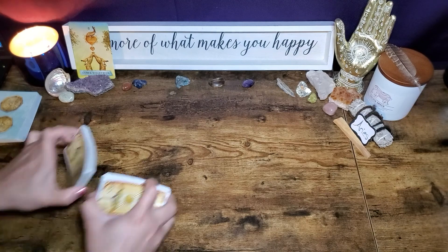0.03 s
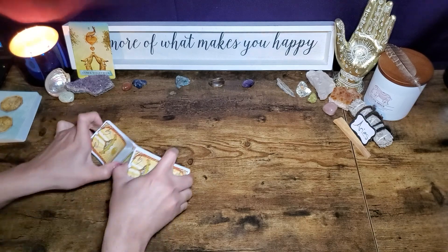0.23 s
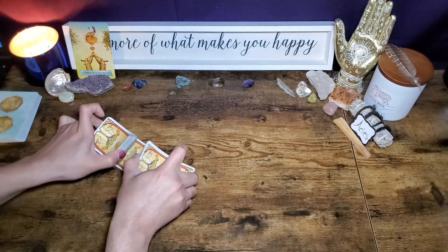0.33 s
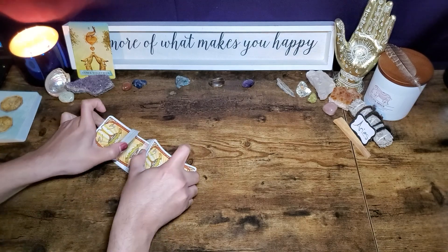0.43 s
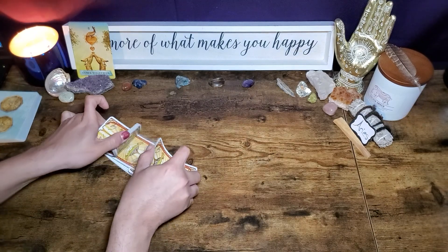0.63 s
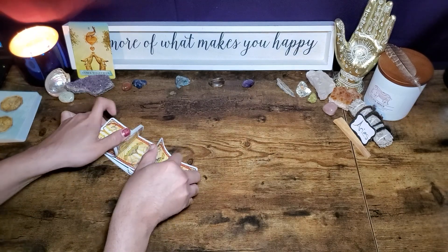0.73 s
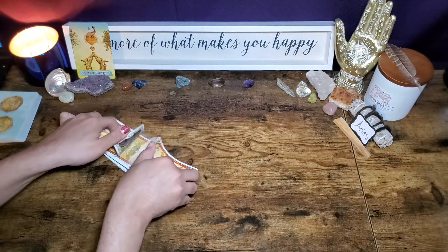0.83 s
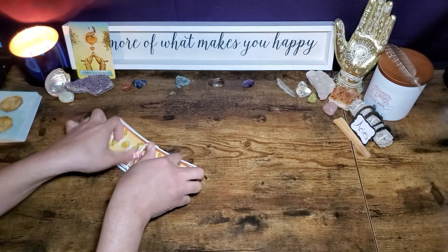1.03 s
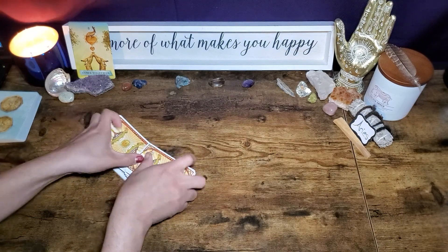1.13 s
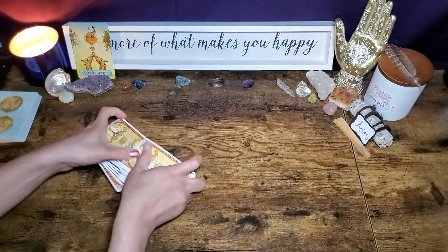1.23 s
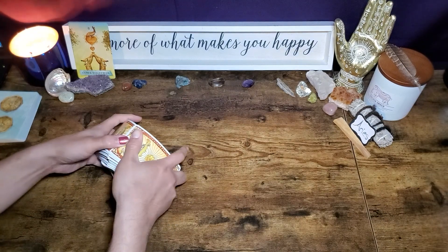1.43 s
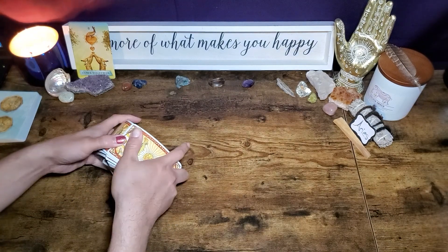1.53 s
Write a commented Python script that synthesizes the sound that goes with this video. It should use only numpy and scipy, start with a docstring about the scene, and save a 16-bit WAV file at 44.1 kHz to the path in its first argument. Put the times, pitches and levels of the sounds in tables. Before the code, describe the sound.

A card riffle: two halves of a stiff deck snap together quickly, then are squared up softly

```python
"""Two halves of a deck of stiff cards are riffled on a wooden table in a quiet room, then squared up.
0.2-1.0 s: riffle; slaps are decaying noise through card resonances, knocks and one card snap are short rough
tones, sliding cards are coloured noise that dips briefly at 0.80 s, bumps ring low table modes. 1.16 s: one
faint slap and knock. 1.43-1.6 s: squaring up, softer slaps and knocks, a rustle that rises to the end.
Throughout: echoes of slaps and knocks in a noise tail, noise as room tone, a faint wavering hum."""
import sys
import numpy as np
from scipy import signal
from scipy.fft import rfft, irfft
from scipy.io import wavfile
from scipy.ndimage import uniform_filter1d

SR = 44100
rng = np.random.default_rng(int(sys.argv[2]) if len(sys.argv) > 2 else 0)


def dump_mix(stems):
    """Bounce the given channels to the path in sys.argv[1] as a 16-bit WAV at rate SR."""
    frames = np.atleast_2d(stems).T  # one column per channel
    limited = np.clip(frames, -1, 1)  # hard clip at full scale
    pcm = np.round(limited * 32767).astype(np.int16)
    wavfile.write(sys.argv[1], SR, pcm)


def amplitude_ratio(level_db):
    """Convert a level in decibels to the matching linear amplitude (field) ratio."""
    exponent = np.asarray(level_db, float) / 20
    return 10 ** exponent


N = 70560


def colour(x, points):
    """Filter through (f/Hz, level/dB) points, straight lines over log frequency."""
    f_hz, level_db = np.array(points, float).T
    bins_hz = np.maximum(np.arange(len(x) // 2 + 1) * SR / len(x), 1)
    gain = amplitude_ratio(np.interp(np.log(bins_hz), np.log(f_hz), level_db))
    return irfft(rfft(x) * gain, len(x))


def unit(x):
    """Scale to an rms of 1."""
    return x / np.sqrt(np.mean(x ** 2))


def ring(x, peaks):
    """Sum of resonances, each applied twice and scaled to its own energy in every row."""
    out = 0
    for f_hz, width_hz, level_db in peaks:
        b, a = signal.iirpeak(f_hz, f_hz / width_hz / np.sqrt(2), fs=SR)
        y = signal.lfilter(b, a, signal.lfilter(b, a, x))
        out = out + amplitude_ratio(level_db) * y / np.sqrt(np.sum(y ** 2, axis=-1, keepdims=True))
    return out


def walk(rate_hz):
    """Random values drawn rate_hz times a second, joined by ramps."""
    hold = max(int(SR / rate_hz), 1)
    steps = np.repeat(rng.standard_normal(N // hold + 1), hold)
    return uniform_filter1d(steps, hold)[:N]


def place(starts_s, sounds):
    """Lay each sound on the time line at its start."""
    out = np.zeros(N + sounds.shape[1])
    for start, one in zip((starts_s * SR).astype(int), sounds):
        out[start:start + len(one)] += one
    return out[:N]


def match_energy(x, shape):
    """Give each row the energy of a sine under its envelope."""
    return x * np.sqrt(np.sum(shape ** 2, axis=1) / 2 / np.sum(x ** 2, axis=1))[:, None]


# card slaps: t/s, card level/dB, flex level/dB, edge tick level/dB, contact/ms
SLAP_EVENTS = [(0.205, -50, -53, -66, 3.9), (0.2226, -29.5, -32, -40, 9), (0.2377, -20.5, -24, -24, 4.9),
               (0.332, -22, -17.5, -22, 2.5), (0.3412, -19, -17, -24, 8.5), (0.351, -9.5, -22, -14.5, 3.15),
               (0.392, -12, -14.5, -15, 2.5), (0.407, -18.5, -20, -21, 4.7), (0.4154, -19, -17, -21, 2.4),
               (0.449, -10.5, -12.5, -11.5, 1.86), (0.4598, -18.5, -22, -19.5, 4.3),
               (0.492, -25, -27.5, -22, 1.4), (0.5079, -15, -13, -18, 1.8), (0.5224, -7, -8, -5, 2.45),
               (0.56, -13, -13, -17.5, 3.1), (0.5784, -6.5, -15, -0.5, 1.3), (0.5841, -10.5, -12.5, -13, 3),
               (0.6308, -10, -8, -11.5, 3.8), (0.6623, -5.5, -2.5, -9.5, 2.6), (0.6823, -9.5, -9, -11, 2.4),
               (0.7024, -2.5, -2.5, -8.5, 1.6), (0.7327, -5.5, -11.5, -3.5, 1.4),
               (0.7384, -11.5, -32.5, -29.5, 1.6), (0.7496, 0.5, -5.5, -5.5, 1.23),
               (0.7577, -11.5, -22.5, -31, 9), (0.802, -4, -2, -11.5, 1.28), (0.8115, -13, -23, -34.5, 1),
               (0.8164, -13, -7, -11, 2.2), (0.8638, -22.5, -12, -19, 2.6),
               (0.8742, -12, -15.5, -18.5, 2.54), (0.9301, -20.5, -18.5, -16.5, 2.1),
               (0.937, 0.5, -9.5, -2.5, 1.24), (0.984, -20.5, -31.5, -21, 2.9),
               (1.1627, -47, -48.5, -58, 2.3), (1.456, -32.5, -37, -35, 7.1),
               (1.4779, -30, -28, -27.5, 2.8), (1.4907, -18, -20, -38, 0.72), (1.5032, -23, -28, -22, 0.71),
               (1.5136, -23, -18, -32, 1.33), (1.5183, -19, -29.5, -18, 2.2),
               (1.5629, -10, -16, -9.5, 0.92), (1.5808, -23, -30, -24, 1.2)]
# resonances of the flexing card, card face and card edge: f/Hz, width/Hz, relative level/dB
FLEX_PEAKS = [(1480, 500, 5.6), (2217, 282, 9.4), (3040, 597, 13.2)]
CARD_PEAKS = [(4780, 1560, 6.8), (6010, 2110, 11.8), (7230, 2100, 4.5)]
EDGE_PEAKS = [(12450, 3200, 0)]
SLAP_ATTACK_MS, SLAP_GRAIN_DB = 0.48, 4.5  # grain: deviation before smoothing


def slaps():
    """A grainy rattle decays with the contact length and rings flex, card and edge."""
    t_ms = np.arange(2048) / SR * 1000
    t_s, card_db, flex_db, edge_db, contact_ms = np.array(SLAP_EVENTS).T[:, :, None]
    chance = rng.standard_normal((len(t_s), 2, len(t_ms)))
    grit = chance[:, 0] * amplitude_ratio(SLAP_GRAIN_DB * uniform_filter1d(chance[:, 1], size=16))
    layers = ((flex_db, 1.0, FLEX_PEAKS), (card_db, 0.9, CARD_PEAKS), (edge_db, 0.6, EDGE_PEAKS))
    sound = 0
    for level_db, share, peaks in layers:
        decay_ms = np.maximum(contact_ms, 0.3) * share
        shape = (1 - np.exp(-t_ms / SLAP_ATTACK_MS)) * np.exp(-t_ms / decay_ms)
        sound = sound + amplitude_ratio(level_db) * match_energy(ring(shape * grit, peaks), shape)
    return place(t_s[:, 0], sound)


# knocks of the pile, and a card snap at 3200 Hz: t/s, f/Hz, level/dB before the high-pass
KNOCK_EVENTS = [(.207, 477, -30), (.224, 627, -22.5), (.238, 540, -25.5), (.265, 805, -33), (.332, 980, -8),
                (.335, 313.5, -28.5), (.342, 980, -17.5), (.353, 980, -14.5), (.392, 833, -21),
                (.407, 1022, -6.5), (.449, 677, -16), (.492, 450, -31), (0.509, 900, -16.5),
                (0.523, 487, -17.5), (.561, 392, -29), (.584, 538, -17.5), (.631, 930, -13.5),
                (.663, 738, -12.5), (0.7029, 607, -9.5), (.704, 1034, -13.5), (0.7328, 3200, 6),
                (.734, 795, -16), (.818, 708, -9.5), (.832, 492, -17), (.865, 688, -15.5), (.983, 754, -27),
                (1.163, 1790, -44.5), (1.167, 477, -42), (1.431, 650, -47), (1.456, 750, -30),
                (1.471, 710, -29.5), (1.479, 860, -28), (1.5014, 330, -28), (1.514, 380, -29.5),
                (1.538, 444, -33), (1.546, 860, -26), (1.562, 330, -34), (1.576, 443, -34)]
KNOCK_ATTACK_MS, KNOCK_DECAY_CYCLES, KNOCK_ROUGH = 0.3, 1.85, 0.57
OVERTONE_RATIO, OVERTONE_SPREAD, OVERTONE_DB = 1.684, 0.13, -6  # mean ratio, relative deviation
PILE_LOW_HZ = 263  # the small pile radiates no bass


def knocks():
    """Pile knocks and a card snap: each rings for a few rough cycles, its overtone elsewhere each time."""
    t = np.arange(2048) / SR
    t_s, f_hz, level_db = np.array(KNOCK_EVENTS).T[:, :, None]
    chance = rng.standard_normal((len(t_s), len(t) + 1))
    # x4 restores the deviation lost in smoothing
    rough = 1 + KNOCK_ROUGH * 4 * uniform_filter1d(chance[:, 1:], size=16)
    over_hz = f_hz * OVERTONE_RATIO * (1 + OVERTONE_SPREAD * chance[:, :1])
    tone = np.sin(2 * np.pi * f_hz * t) + amplitude_ratio(OVERTONE_DB) * np.sin(2 * np.pi * over_hz * t)
    attack = 1 - np.exp(-t * 1000 / KNOCK_ATTACK_MS)
    shape = attack * np.exp(-t * f_hz / KNOCK_DECAY_CYCLES)
    rung = place(t_s[:, 0], amplitude_ratio(level_db) * match_energy(shape * rough * tone, shape))
    return signal.sosfilt(signal.butter(4, PILE_LOW_HZ, "high", fs=SR, output="sos"), rung)


# sliding cards, with a brief drop of level at 0.80 s that is not due to the sliding:
# t/s, hiss level/dB, rustle level/dB, treble level/dB
SLIDE_LEVELS = [(.2, -84, -78, -91), (0.248, -41, -45, -78), (0.318, -62, -59, -72),
                (0.356, -40, -33.5, -59), (0.541, -39, -33.5, -63), (.62, -40.5, -38.5, -54),
                (0.681, -35.5, -27.5, -46), (.765, -30, -36.5, -51), (0.792, -28.5, -32, -53.5),
                (0.803, -45.5, -57.5, -77), (0.812, -16, -33.5, -53.5), (0.828, -25.5, -29, -66.5),
                (0.911, -40, -36, -64), (0.949, -31.5, -34.5, -49.5), (1.001, -43.5, -48, -82.5),
                (1.081, -66, -64.5, -88.5), (1.252, -74, -72.5, -81), (1.37, -68, -83.5, -72.5),
                (1.441, -58, -62, -51.5), (1.6, -45, -44.5, -53)]
# relative spectra of hiss, rustle and treble: f/Hz, level/dB per Hz
HISS_COLOUR = [(1200, -41), (2000, -11), (3000, 1), (4500, 3), (6300, 1), (8500, -8), (11000, -34)]
RUSTLE_COLOUR = [(30, -27.5), (70, -2.5), (110, -10), (300, 0.5), (900, -3), (2000, -4.5), (4000, -26.5)]
TREBLE_COLOUR = [(7000, -21), (10500, -6.5), (15500, -9.5), (16500, -26)]
RUB_DB, GRAIN_HZ, RUSTLE_HZ = 2.5, 300, 120  # deviation before ramping, draw rates


def sliding():
    """Card faces rub: a grainy hiss with an airy top and a duller rustle of the pile."""
    t = np.arange(N) / SR
    t_s, hiss_db, rustle_db, treble_db = np.array(SLIDE_LEVELS).T
    grain = rng.standard_normal(N) * amplitude_ratio(RUB_DB * walk(GRAIN_HZ))
    pile = rng.standard_normal(N) * amplitude_ratio(RUB_DB * walk(RUSTLE_HZ))
    hiss = unit(colour(grain, HISS_COLOUR)) * amplitude_ratio(np.interp(t, t_s, hiss_db))
    rustle = unit(colour(pile, RUSTLE_COLOUR)) * amplitude_ratio(np.interp(t, t_s, rustle_db))
    treble = unit(colour(grain, TREBLE_COLOUR)) * amplitude_ratio(np.interp(t, t_s, treble_db))
    return hiss + rustle + treble


# hands and pile bump the table: t/s, level/dB
BUMP_EVENTS = [(0.112, -54.5), (0.206, -41.5), (0.522, -40.5), (0.585, -40), (0.63, -33), (.665, -34),
               (0.704, -27.5), (.817, -32), (.865, -30.5), (1.165, -51.5), (1.435, -49.5), (1.502, -47.5),
               (1.558, -52)]
# table top modes: mean f/Hz, mean relative level/dB, t60/s
TABLE_MODES = [(134.3, 2.5, 0.21), (225.7, -9.5, 0.34), (329.8, -4, 0.21)]
BUMP_ATTACK_MS, BUMP_VARY_DB, BUMP_VARY_PITCH = 3, 2, 0.037  # pitch: relative deviation


def table():
    """Soft pushes ring the low modes of the table top, each a little different every time."""
    chance = rng.standard_normal((len(BUMP_EVENTS), len(TABLE_MODES)))
    t, out = np.arange(N) / SR, 0
    for (t_s, bump_db), vary in zip(BUMP_EVENTS, chance):
        since = np.maximum(t - t_s, 0)
        attack = 1 - np.exp(-since * 1000 / BUMP_ATTACK_MS)
        for (f_hz, mode_db, t60_s), v in zip(TABLE_MODES, vary):
            level = amplitude_ratio(bump_db + mode_db + BUMP_VARY_DB * v - 60 * since / t60_s)
            mode_hz = f_hz * (1 + BUMP_VARY_PITCH * v)
            out = out + level * attack * np.sin(2 * np.pi * mode_hz * since)
    return out


# colour of the echoes: f/Hz, relative level/dB
ECHO_COLOUR = [(100, -30.5), (700, -0.5), (3000, -9), (7000, -9.5), (11000, -7.5), (16000, -21.5)]
ROOM_T60_S, ROOM_DB, ROOM_RISE_MS = 0.13, -11, 3.3


def room(x):
    """A short dense tail of echoes, duller than the direct sound."""
    t = np.arange(SR // 2) / SR
    rise = np.clip(t * 1000 / ROOM_RISE_MS, 0, 1) ** 2
    tail = colour(rng.standard_normal(len(t)), ECHO_COLOUR) * amplitude_ratio(-60 * t / ROOM_T60_S) * rise
    tail = tail / np.sqrt(np.sum(tail ** 2))
    return signal.fftconvolve(x, tail)[:N] * amplitude_ratio(ROOM_DB)


# relative spectrum of the room tone: f/Hz, level/dB per Hz
AIR_COLOUR = [(25, -16.5), (60, 0), (160, -12.5), (600, -26), (1000, -22), (1900, -43), (5000, -28.5),
              (9500, -41), (15500, -40)]
# wavering hum in the room: f/Hz, width/Hz, level/dB
HUM_BANDS = [(328, 5, -72)]
AIR_DB = -65.5


def air():
    """Room tone is coloured noise; the hum is noise through a narrow resonance, so it wavers."""
    out = unit(colour(rng.standard_normal(N), AIR_COLOUR)) * amplitude_ratio(AIR_DB)
    for f_hz, width_hz, level_db in HUM_BANDS:
        hum = ring(rng.standard_normal(N), [(f_hz, width_hz, 0)])
        out = out + amplitude_ratio(level_db) * unit(hum)
    return out


def scene():
    """Only slaps and knocks feed the echoes."""
    hits = slaps() + knocks()
    return (hits + sliding() + table() + room(hits) + air())[None]


def band_limit(x):
    """A steep low-pass at the top of the band."""
    return signal.sosfilt(signal.butter(12, 16980, fs=SR, output="sos"), x)


def record(dry):
    """Loud peaks are rounded, the microphone drops the deep bass and the top is cut."""
    low_hz, top_hz = 70, 15900
    x = np.tanh(0.91 * dry) / 0.7
    x = signal.sosfilt(signal.butter(2, low_hz, "high", fs=SR, output="sos"), x)
    x = signal.sosfilt(signal.butter(12, top_hz, fs=SR, output="sos"), x)
    return band_limit(x)


dry = scene()
out = record(dry)
dump_mix(out)
```